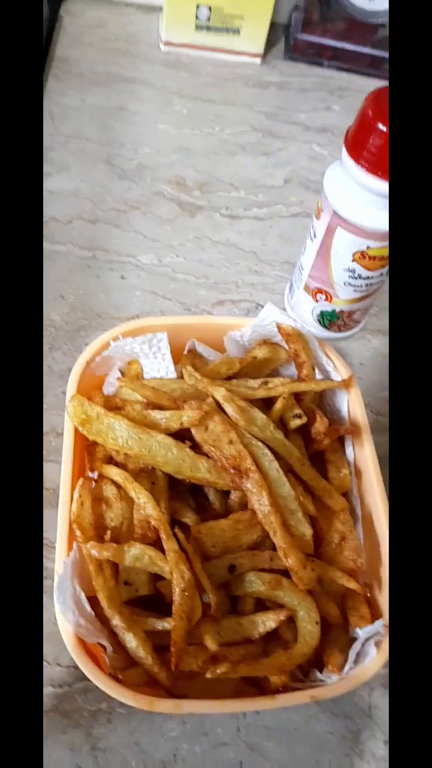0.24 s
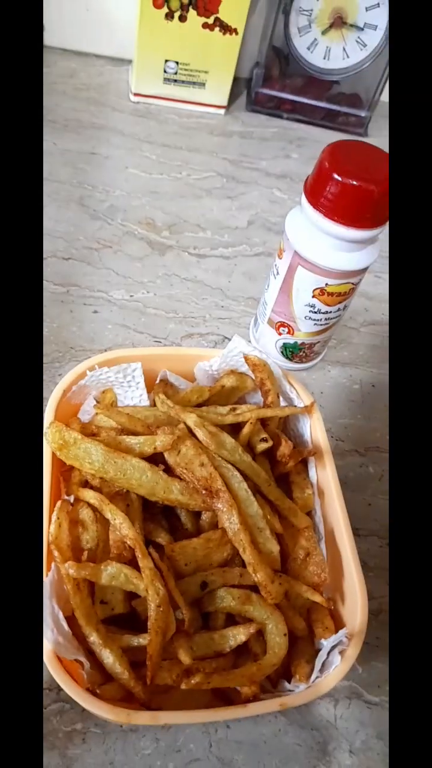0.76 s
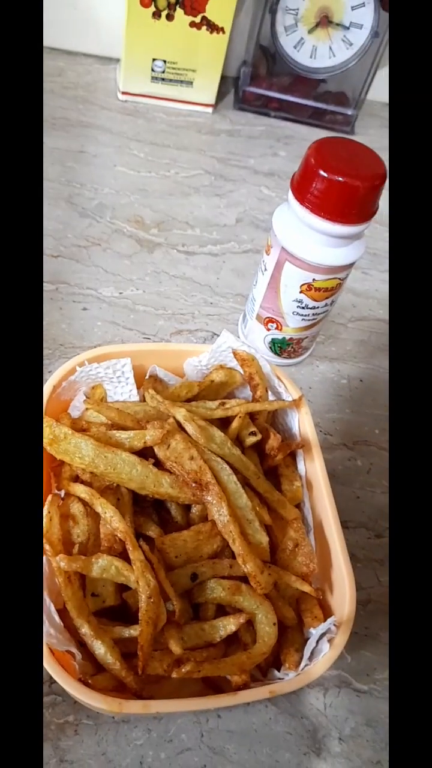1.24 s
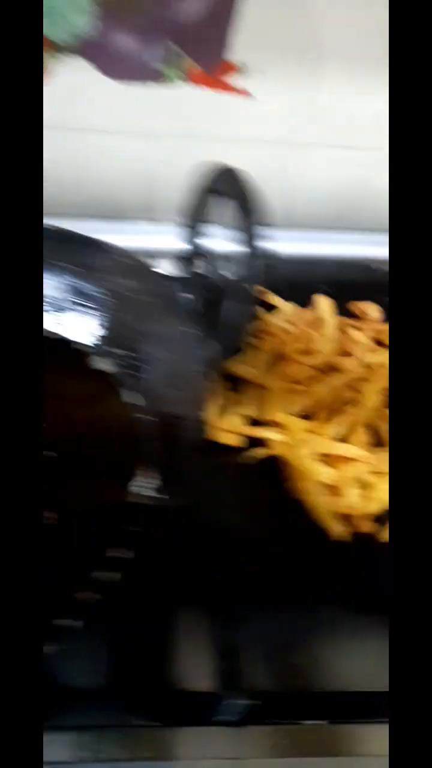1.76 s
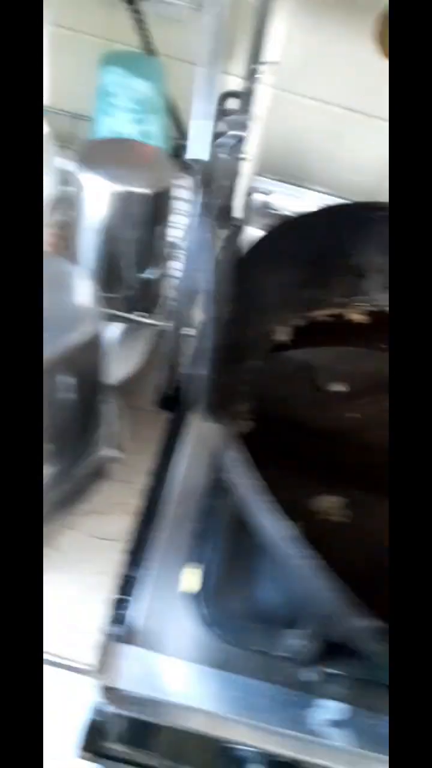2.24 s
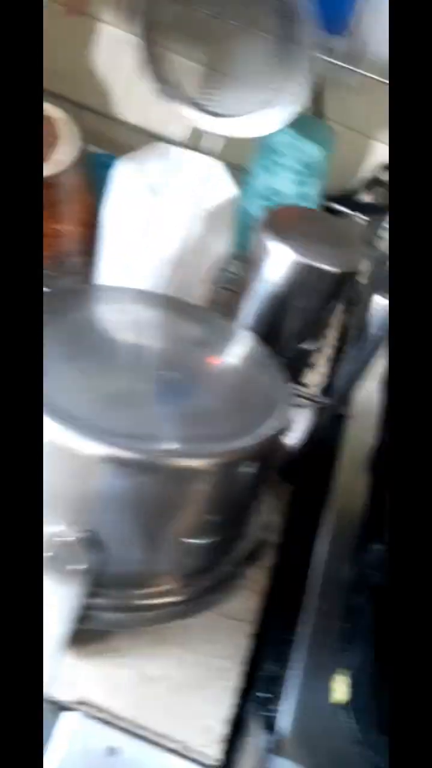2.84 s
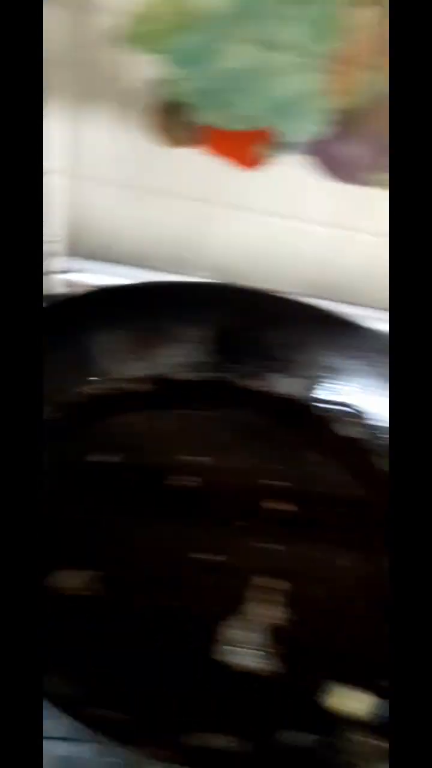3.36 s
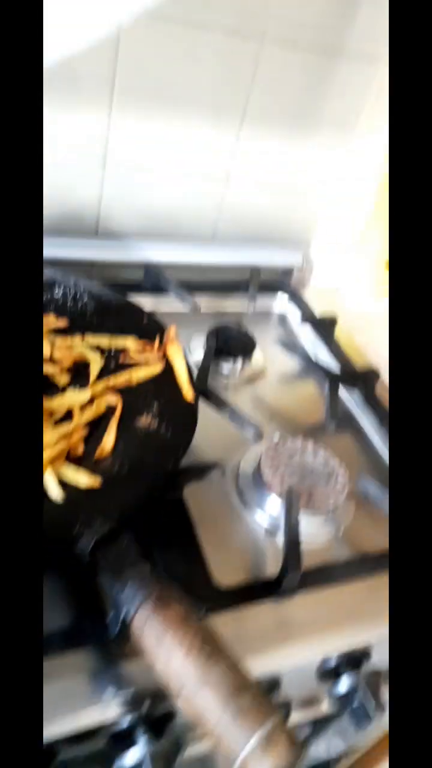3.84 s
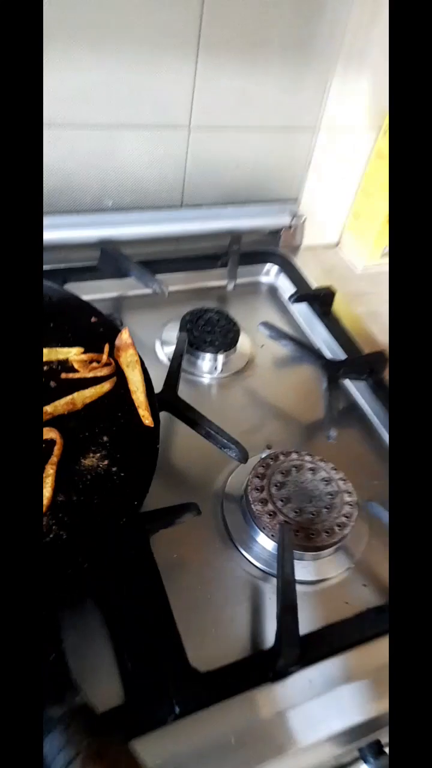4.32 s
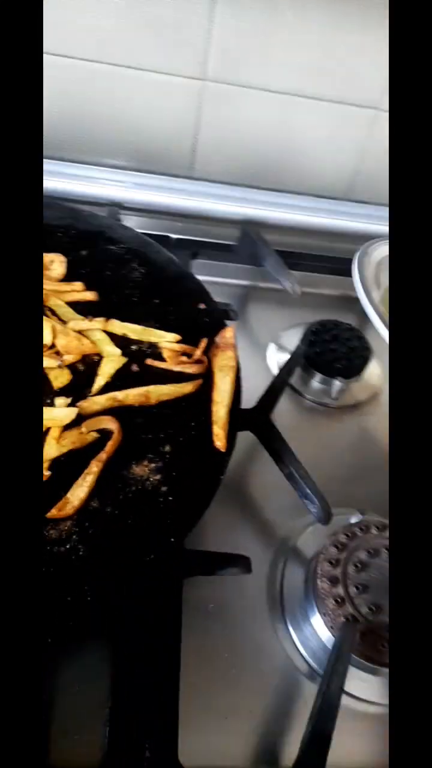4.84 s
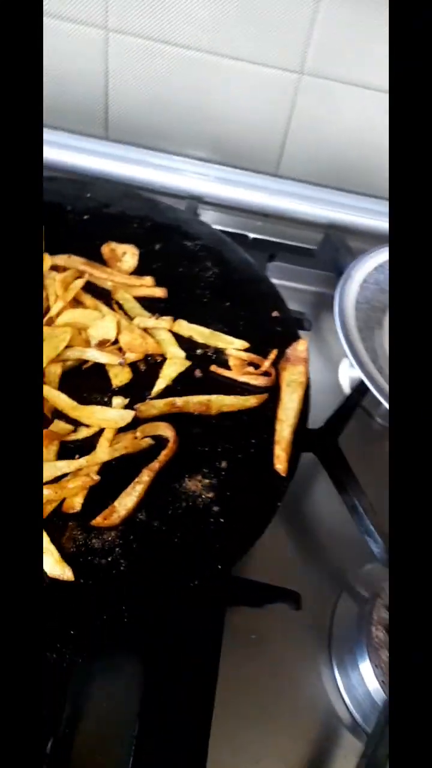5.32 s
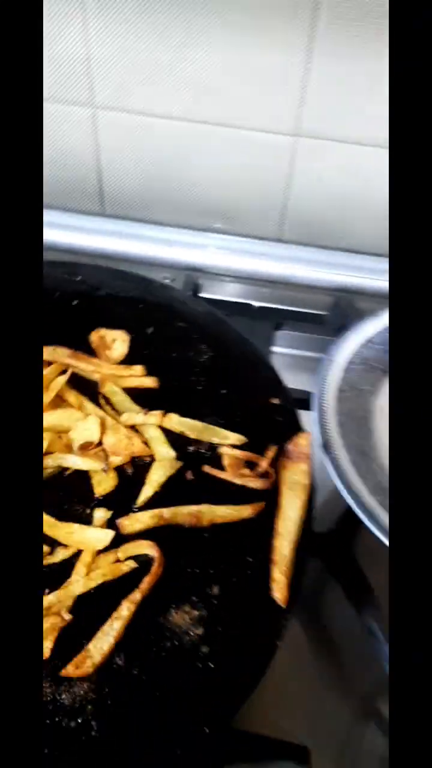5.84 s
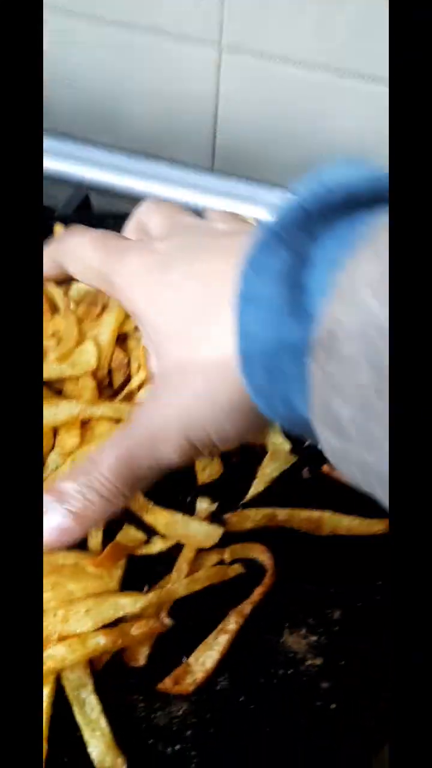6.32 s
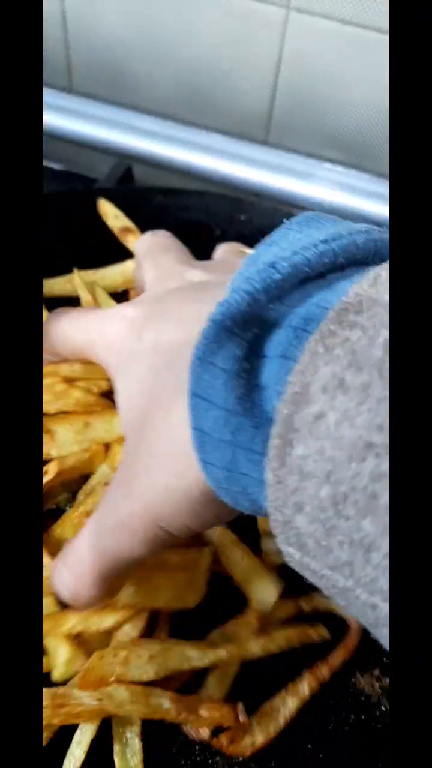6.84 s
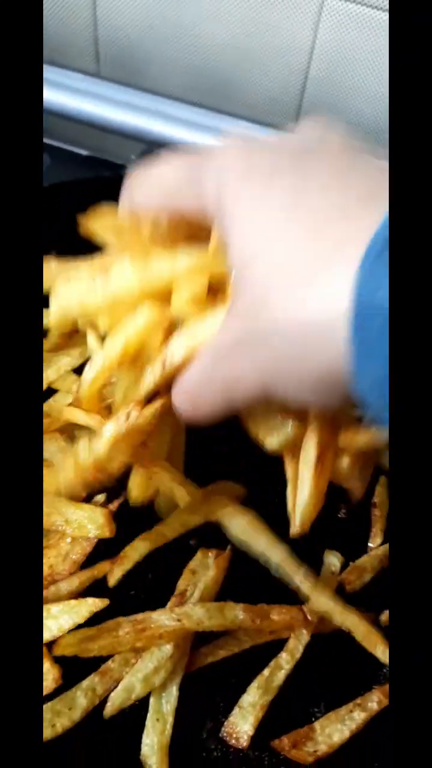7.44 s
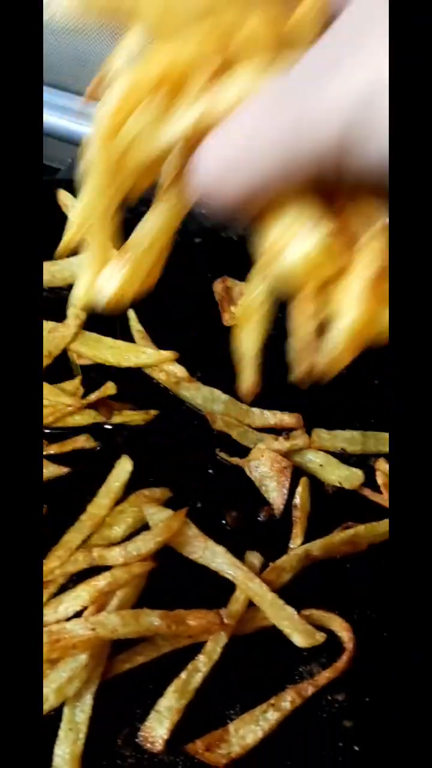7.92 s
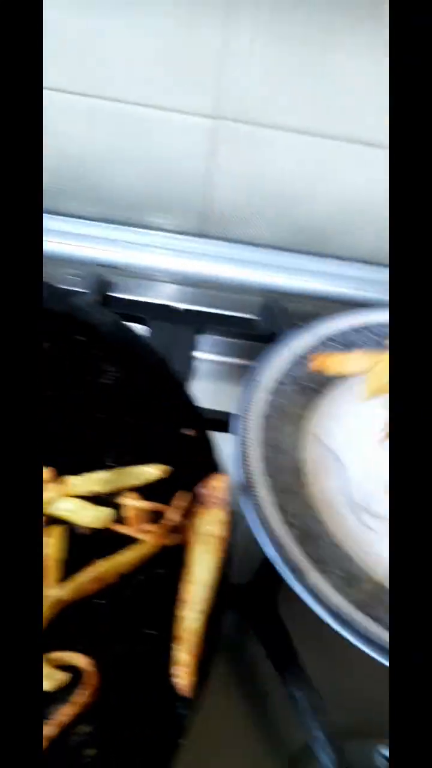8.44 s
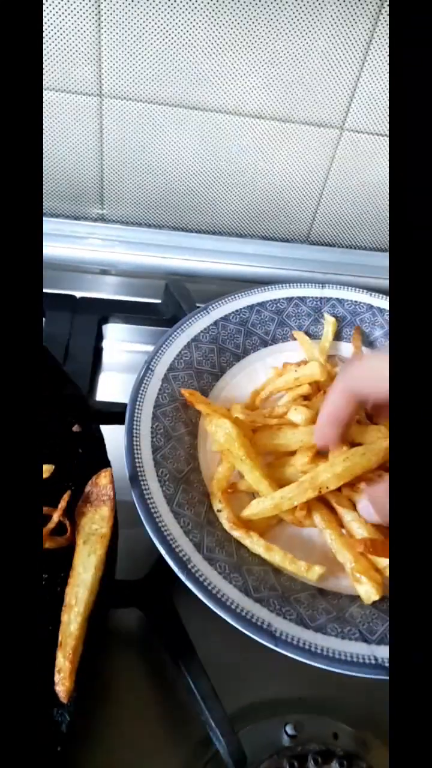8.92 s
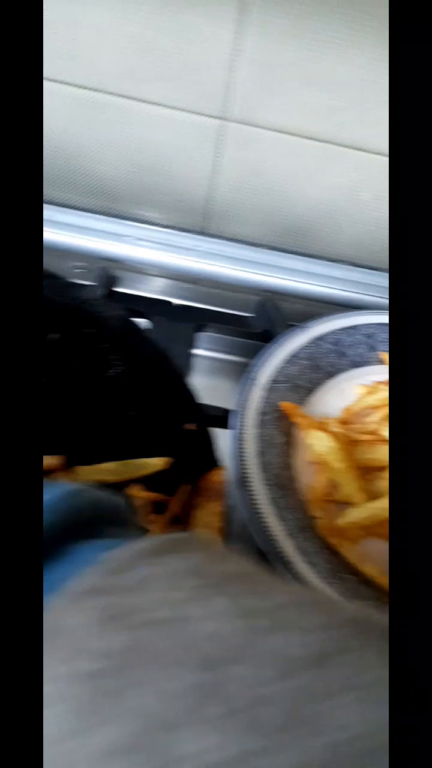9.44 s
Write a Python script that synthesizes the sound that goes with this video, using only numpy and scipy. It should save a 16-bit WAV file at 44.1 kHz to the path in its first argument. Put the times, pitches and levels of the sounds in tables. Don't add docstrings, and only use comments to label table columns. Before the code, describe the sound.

In a quiet tiled kitchen, a dish rattles off a wire rack among clanging steel pots, lands hard on an iron grate, then fries drop onto it.

```python
import sys
import numpy as np
from scipy import signal
from scipy.fft import rfft, irfft, next_fast_len
from scipy.io import wavfile

SR = 44100
rng = np.random.default_rng(int(sys.argv[2]) if len(sys.argv) > 2 else 0)


def invert_db(x):
    u = np.asarray(x, float) / 20
    return 10 ** u


def unload_wav(signal):
    wavfile.write(
        sys.argv[1],
        SR,
        np.round(np.clip(np.atleast_2d(signal).T, -1, 1) * 32767).astype(np.int16),
    )


N = 426447
STEP = 32
GAP_S = 1.376, 1.489


def rms_one(x):
    return x / np.sqrt(np.mean(x ** 2) + 1e-20)


def full(control):
    return np.repeat(control, STEP)[:N]


def in_time(rows, outside=None):
    s, *columns = np.transpose(rows)
    control_s = np.arange(0, N, STEP) / SR
    return np.array([np.interp(control_s, s, column, outside, outside) for column in columns])


def at_hz(points, hz, outside=None):
    table_hz, values = np.array(points).T
    return np.interp(np.log(hz), np.log(table_hz), values, outside, outside)


def flicker(rate, spread_db):
    knots = invert_db(spread_db * rng.standard_normal(int(N / SR * rate * 2) + 2))
    places = np.linspace(0, len(knots) - 1, -(-N // STEP))
    return np.interp(places, np.arange(len(knots)), knots)


def swells(rows):
    peak, rise, fall = np.transpose(rows)[:3, :, None]
    late = np.arange(0, N, STEP) / SR - peak
    depth_db = 20
    return invert_db(-depth_db * np.maximum(-late / np.abs(rise), late / np.abs(fall)))


# (frequency [Hz], left-right likeness [0-1])
STEREO_LIKENESS = [(60, 0.89), (180, 0.89), (340, 0.67), (520, 0.47), (1000, 0.014)]
EDGES = 22 * 2 ** np.arange(0, 9.8, .5)
BANK = [signal.butter(2, edge, "band", fs=SR, output="sos") for edge in zip(EDGES, EDGES[1:])]


def likeness(hz):
    return np.clip(at_hz(STEREO_LIKENESS, hz), 0, 1)


def bands(white, shape):
    mids = sides = 0
    for k, hz in enumerate(np.sqrt(EDGES[1:] * EDGES[:-1])):
        gain = shape(hz)
        if np.max(gain) > 1e-6:
            mid, side = signal.sosfilt(BANK[k], white[k % 2]) * gain
            alike = likeness(hz)
            mids = mids + np.sqrt(1 + alike) * mid
            sides = sides + np.sqrt(1 - alike) * side
    return np.array([mids + sides, mids - sides])


def steady(white, spectrum, patchy_db):
    def gain(hz):
        return full(invert_db(at_hz(spectrum, hz, -300)) * flicker(6, patchy_db))
    return rms_one(bands(white, gain))


def grains(per_s, size_db, count):
    shape = (2, 2, count)
    sizes = invert_db(size_db * np.minimum(rng.exponential(1, shape), 5))
    signs = np.sign(rng.random(shape) - .5)
    return rms_one(sizes * signs * (rng.random(shape) < per_s / SR))


def dying(clicks, t60, hz):
    r = invert_db(-60 / (np.clip(t60, .002, 3) * SR))
    w = 2 * np.pi * hz / SR
    return signal.lfilter([0, np.sin(w)], [1, -2 * r * np.cos(w), r * r], clicks + 1e-18)


def ringing_modes(modes, t):
    hz, _, t60 = np.transpose(modes)[:, :, None]
    apart = np.pi / 4 * (1 - likeness(hz)) * (-1) ** np.arange(len(hz))[:, None]
    rings = np.sin(2 * np.pi * hz * t + np.array([apart, -apart]))
    rings *= invert_db(-60 * t / np.clip(t60, .005, 1)) * np.cos(np.pi * t)
    wobble = rng.standard_normal((40, 80))[:len(hz)]
    rings *= [1 + np.interp(t, np.linspace(0, .5, 80), w) * np.minimum(t / .015, 1.1) for w in wobble]
    return rings


def blows(hits, modes, crack, ring_db, crack_db, crack_t60, lag_s):
    out = np.zeros((2, N + SR))
    t = np.arange(SR // 2) / SR
    short = t[:SR // 10]
    crack_top = max(at_hz(crack, hz) + 10 * np.log10(hz) for hz in EDGES)
    hz, level_db, _ = np.transpose(modes)
    rings = ringing_modes(modes, t)
    for s, db, pan, *colour in hits:
        bass, treble = colour or (-2.5, -3.5)

        def tilt(f):
            return db + np.interp(np.log(f), np.log([300, 1500, 8000]), [bass, 0, treble])

        def crack_gain(f):
            decay_db = 60 * short / crack_t60 * (f / 1000) ** 0.15
            return invert_db(at_hz(crack, f, -300) + 40.0 - crack_top + tilt(f) + crack_db - decay_db)

        chance_db, sign = rng.standard_normal((2, 40))[:, :len(hz)]
        ring = invert_db(tilt(hz) + level_db + ring_db + 2 * chance_db) * np.sign(sign) @ rings
        noise = rng.standard_normal((2, 2, len(short))) * [[1], [.9]]
        sides = invert_db([[pan / 2], [-pan / 2]])
        burst = bands(noise, crack_gain) * sides * np.cos(5 * np.pi * short)
        at = int(s * SR)
        out[:, at:at + len(t)] += ring * sides
        for side, late in enumerate((at, at + int(lag_s * SR))):
            out[side, late:late + len(short)] += burst[side]
    return out[:, :N]


# (frequency [Hz], level [dB per Hz])
RUMBLE_SPECTRUM = [(22, -45), (42, -15), (75, 0.5), (126, -1.5), (173, -19.5), (200, -22), (260, -47.5),
                   (440, -120)]
# (frequency [Hz], level [dB per Hz])
LOW_AIR_SPECTRUM = [(100, -37.5), (170, -20.5), (280, -3), (327, 1), (415, -9), (614, -16), (887, -21.5),
                    (1560, -61)]
# (time [s], rumble level [dB])
MOTION_LEVEL = [(0.0, -58.5), (0.91, -62), (1.4, -59), (1.99, -52.5), (2.56, -53), (3.2, -70), (3.5, -56.5),
                (4.07, -70), (4.58, -53), (5.2, -61.5), (5.95, -48), (6.7, -61.5), (7.19, -49.5),
                (7.92, -50), (8.29, -71), (9.2, -51.5), (9.67, -63)]
# (peak time [s], rise [s], fall [s], rumble level [dB], low air level [dB])
WORKTOP_BOOMS = [
    (2.72, 0.17, 0.72, -45.5, -58),
    (2.95, 0.46, 0.15, -49.5, -43),
    (3.424, 0.02, 0.46, -61, -76),
    (4.5, .5, 0.51, -62.5, -53.5),
    (5.38, 0.04, 0.27, -38, -50.5),
    (5.47, .1, .1, -52, -32),
    (5.625, 0.016, 0.23, -36, -34),
    (8.29, 0.21, 0.53, -56.5, -59.5),
    (8.72, 0.13, 0.16, -38, -63.5),
    (9.451, 0.29, 0.53, -75, -63),
]


def rumble_and_low_air():
    white = rng.standard_normal((2, 2, N))
    motion_db = in_time(MOTION_LEVEL)[0]
    boom, puff = invert_db(np.transpose(WORKTOP_BOOMS)[3:]) @ swells(WORKTOP_BOOMS)
    rumble = full(invert_db(motion_db) + boom) * steady(white, RUMBLE_SPECTRUM, patchy_db=5.0)
    calm_db, air_db, air_follows = -58, -70.5, 0.26
    air_level = full(invert_db(air_db + air_follows * (motion_db - calm_db)) + puff)
    cupboard = invert_db(-7) * rms_one(dying(rng.standard_normal(N), t60=0.6, hz=321.6))
    return rumble + air_level * (steady(white, LOW_AIR_SPECTRUM, patchy_db=4.0) + cupboard)


# (frequency [Hz], level [dB per Hz])
HISS_SPECTRUM = [(600, -11), (2300, -7), (3960, -17), (5180, -9.5), (7770, -20), (13700, -6.5), (15100, -5),
                 (16000, -11)]
# (frequency [Hz], ring t60 [s], level [dB], rise after the gap [dB])
HISS_HUMPS = [
    (2070, 0.012, -89, -2),
    (5200, 0.002, -85.5, 8.5),
    (6400, .002, -91, 7.5),
]


def hiss():
    after_gap = np.arange(N) / SR > GAP_S[1]
    bed = invert_db(-81) * steady(rng.standard_normal((2, 2, N)), HISS_SPECTRUM, patchy_db=2.5)
    out = bed * np.where(after_gap, invert_db(8), 1)
    white = rng.standard_normal((2, N))
    for hz, t60, db, rise_db in HISS_HUMPS:
        out = out + invert_db(db + rise_db * after_gap) * rms_one(dying(white, t60, hz))
    return out


# (time [s], level [dB])
WHINE_LEVEL = [(0, -80.5), (1.4, -80), (1.5, -82.5), (4.6, -89), (4.8, -80), (5.3, -80), (6, -92),
               (9.67, -91)]


def whine():
    level = full(invert_db(in_time(WHINE_LEVEL)[0] + 0.5) * flicker(8.9, spread_db=1))
    return level * np.sin(2 * np.pi * 1998 * np.arange(N) / SR)


# (frequency [Hz], t60 [s])
KITCHEN_DECAY = [(100, 0.94), (400, 0.55), (1500, 0.47), (5000, 0.45), (14000, 0.35)]


def kitchen(x):
    t = np.arange(SR) / SR

    def decay(hz):
        return invert_db(-60 * t / np.clip(at_hz(KITCHEN_DECAY, hz), .05, 2)) * np.minimum(t / 0.00054, 1)
    tail = bands(rng.standard_normal((2, 2, SR)), decay)
    tail = tail / np.sqrt(np.sum(tail ** 2) / 2)
    return signal.fftconvolve(x.mean(axis=0, keepdims=True), tail, axes=1)[:, :N]


# (frequency [Hz], left-right balance [dB])
PORT_LEAN = [(120, 2), (270, -3.5), (600, -1), (1400, 1.5), (3000, -1.5), (6000, -0.5), (12000, -2.5)]


def ports(x):
    size = next_fast_len(N + SR // 10, real=True)
    lean = at_hz(PORT_LEAN, np.arange(1, size // 2 + 2) * SR / size) / 2
    return irfft(rfft(x, size) * invert_db([lean, -lean]), size)[:, :N]


# (start time [s], length [s], level [dB], ring [cycles])
SLIDE_EVENTS = [(4.259, 0.1, -63.5, 40), (4.3, 0.2, -64, 53), (6.736, 0.3, -71.5, 120),
                (7.122, 0.16, -55, 35), (8.16, 0.41, -71.5, 26), (3.86, 0.22, -76, 210),
                (9.01, 0.14, -73, 47), (9.14, 0.68, -78.5, 67)]
# (frequency [Hz], ..)
SLIDE_RESONANCES = [
    (1070, 1790, 1960),
    (837, 1067, 2250, 2470, 4040),
    (1197, 1270, 1510),
    (790, 853),
    (392.6, 2430, 2400, 2870),
    (408, 409),
    (915, 1110),
    (4700, 5800, 5980, 6200),
]


def slides():
    out = np.zeros(N)
    t = np.arange(SR // 2) / SR
    for (s, length, db, cycles), resonances in zip(SLIDE_EVENTS, SLIDE_RESONANCES):
        swell = np.minimum(t / 0.011, 1) * np.clip(3 * (1 - t / length), 0, 1)
        push = rng.standard_normal(len(t)) * swell
        sound = sum(dying(push, cycles / hz, hz) for hz in resonances)
        at = int(s * SR)
        out[at:at + len(t)] += invert_db(db - 21.5) * sound
    return out


# (frequency [Hz], level [dB per Hz])
RUBBING_SPECTRUM = [(180, -19.5), (300, -8), (584, -13), (801, -9.5), (4670, -6), (6740, -9), (9470, -16.5),
                    (13500, -4.5)]
# (peak time [s], rise [s], fall [s], level [dB], treble [dB])
RUB_STROKES = [(1.629, 0.35, 3.2, -60.5, -6), (2.4, 0.49, 0.33, -51.5, -3.5), (3.349, 0.2, 1, -77.5, -7),
               (3.72, 0.099, 0.26, -62.5, -10), (4.033, 0.0044, 0.22, -61.5, -1),
               (4.07, 0.025, 0.11, -55.5, -12), (4.309, 0.041, 0.39, -59, -6), (4.534, 0.031, 0.2, -53, -3),
               (5.52, 0.13, 0.33, -60.5, -3.5), (6.566, 0.026, 1.1, -65, -3.5), (6.77, 0.048, 0.24, -57, 1),
               (6.885, 0.092, 0.088, -47.5, 0.5), (6.974, 0.099, 0.056, -50, -4),
               (7.157, 0.19, 0.55, -41.5, -2), (7.4, 0.48, 0.35, -55.5, -5.5),
               (7.63, 0.1, 0.074, -61.5, -4), (7.81, 0.13, 0.015, -58.5, -9),
               (8.217, 0.039, 0.63, -63, -7.5), (9.039, 0.098, 0.11, -60, 0.5), (9.5, 0.5, 0.86, -92, -5),
               (9.67, 0.03, 0.082, -61, 7)]


def rubbing():
    db, treble_db = np.transpose(RUB_STROKES)[3:]
    push = invert_db(db)[:, None] * swells(RUB_STROKES)
    total = push.sum(axis=0)
    level = total * flicker(25, spread_db=2.0)
    treble = treble_db @ push / (total + 1e-30)

    def gain(hz):
        return full(level * invert_db(9.5 + at_hz(RUBBING_SPECTRUM, hz, -300) + treble * np.log2(hz / 2000) / 2))
    rub = bands(grains(per_s=4000, size_db=2.5, count=N), gain)
    return rub * invert_db([[-1.2], [1.2]]) * (np.arange(N) / SR > GAP_S[1])


# (time [s], peak level [dB], left-right [dB])
THUD_HITS = [
    (1.768, -38, -8),
    (5.3, -49.5, 0.5),
    (6.131, -41.5, -8),
    (6.231, -33.5, -4.5),
    (7.03, -33, 1),
]
# (frequency [Hz], level [dB], t60 [s])
HOB_MODES = [(81, -16.5, 0.11), (126, -17.5, 0.074), (192.2, -4.5, 0.2), (215, -18, 0.072),
             (261, -15.5, 0.016), (332, -9.5, 0.12), (322, -0.5, 0.13), (348, -18.5, 0.083),
             (437, -10, 0.02)]
# (frequency [Hz], level [dB per Hz])
THUD_NOISE = [(80, -0.5), (300, -4.5), (900, -6.5), (1800, -26.5), (3000, -26), (6000, -49)]
# (time [s], peak level [dB], left-right [dB])
DOOR_KNOCKS = [
    (3.416, -43, -10),
    (6.934, -37.5, 0.5),
    (7.028, -44, -6),
]
# (frequency [Hz], level [dB], t60 [s])
DOOR_MODES = [(312.2, -1, 0.075), (340, -1, 0.028), (239.4, -16, 0.035), (410, -8, 0.039)]


def thuds():
    hob = blows(THUD_HITS, HOB_MODES, THUD_NOISE, ring_db=-22.0, crack_db=-11.5, crack_t60=0.07, lag_s=.0001)
    door = blows(DOOR_KNOCKS, DOOR_MODES, THUD_NOISE, ring_db=-5.5, crack_db=-18, crack_t60=0.047, lag_s=0)
    return hob + door


# (time [s], peak level [dB], left-right [dB])
TICK_HITS = [(0.219, -44.5, -15), (1.598, -42, -12), (1.849, -39, -5), (3.679, -51, -4),
             (4.031, -47, -22.5), (4.137, -50, -6), (4.267, -52, -2), (4.303, -34.5, 8), (6.558, -53, -14),
             (6.714, -48.5, -15)]
# (frequency [Hz], level [dB], t60 [s])
PAN_MODES = [(1116, -12, 0.11), (1210, -12.5, 0.072), (1250, -3.5, 0.042), (1520, -9, 0.17),
             (1910, -13.5, 0.14), (2580, -14, 0.095), (3138, -8, 0.091), (4500, -7, .02), (4990, -5, 0.035),
             (6300, -2, 0.022)]
# (frequency [Hz], level [dB per Hz])
TICK_NOISE = [(400, -23), (1000, 4), (4000, -2), (9000, -6.5), (16000, -2)]


def ticks():
    return blows(TICK_HITS, PAN_MODES, TICK_NOISE, ring_db=-36, crack_db=2.5, crack_t60=0.0049, lag_s=.0001)


# (time [s], peak level [dB], left-right [dB], bass [dB], treble [dB])
FRY_HITS = [(7.574, -52, -5, -9, 16), (7.592, -32.5, -12, -8, -5.5), (7.598, -33.5, -6, -14, -6),
            (7.644, -42.5, -7, -8, 3), (7.656, -44.5, -6, -2.3, 6), (7.684, -52, -13, 0, 0),
            (7.732, -40, -13, -2, -6), (7.751, -26, -8, 19, -10), (7.757, -33.5, -10, -5, 1),
            (7.767, -33.5, -3, -1, 3.5), (7.929, -36, -6.5, -7, 6.5)]
# (frequency [Hz], level [dB], t60 [s])
RIM_MODES = [(1111, 0, 0.15), (1420, -12, .12), (1510, -7, 0.12), (1760, -11, .08), (2550, -8, .1),
             (3105, -9, 0.07), (4250, -11, 0.12), (4560, 0, 0.03), (6541, -5, 0.07), (6708, -5, 0.04),
             (6955, -4, 0.07), (9400, -6, 0.06), (11000, -9, 0.05), (12640, -6, 0.06)]
# (frequency [Hz], level [dB per Hz])
PAN_NOISE = [(600, -35), (1100, -25), (1500, -4.5), (2500, -3), (4700, 2), (8000, -7.5), (16000, 1)]


def pan_and_rim():
    pan = blows(FRY_HITS[:-1], PAN_MODES, PAN_NOISE, ring_db=-8.0, crack_db=-2.5, crack_t60=0.052, lag_s=.0001)
    rim = blows(FRY_HITS[-1:], RIM_MODES, PAN_NOISE, ring_db=-5.0, crack_db=0.46, crack_t60=0.0807, lag_s=.0001)
    return signal.sosfilt(signal.butter(4, 1150, "high", fs=SR, output="sos"), pan + rim)


# (frequency [Hz], level [dB per Hz])
STEEL_NOISE = [(35, -44.5), (60, -4.5), (212, -19), (553, -3.5), (1510, -2), (3500, -5), (9130, -12.5),
               (16000, -9.5)]
# (time [s], peak level [dB], left-right [dB])
WIRE_PLUCKS = [
    (2.624, -46, 0),
    (2.641, -37, 0),
    (2.657, -21.5, 2),
    (2.67, -20, 2),
    (2.691, -19, 2),
    (2.708, -21, 2),
    (2.757, -19, 2),
    (2.772, -19.5, 2),
    (2.878, -22, 2),
]
# (frequency [Hz], level [dB], t60 [s])
WIRE_MODES = [(1450, -6, .035), (2150, 0, .045), (2270, -1, .045), (2480, -5, .035), (2950, -9, .03)]


def wires():
    return blows(WIRE_PLUCKS, WIRE_MODES, STEEL_NOISE, ring_db=-3, crack_db=-25, crack_t60=.04, lag_s=0)


# (time [s], level [dB])
DRAG_LEVEL = [(2.615, -62), (2.65, -46.5), (2.665, -26), (2.72, -24.5), (2.78, -28), (2.83, -35.5),
              (2.9, -33.5), (2.96, -32), (3.0, -36.5)]
# (frequency [Hz], level [dB], t60 [s])
RACK_MODES = [(311.3, -16, 0.2), (703, -12.5, 0.051), (1340, -7, 0.06), (1600, -7.5, 0.032),
              (2210, -4, 0.07), (2096, -8, 0.08), (3087, -10, 0.11), (4540, -14.5, 0.06),
              (5400, -12.5, 0.037)]


def drag():
    out = np.zeros((2, N))
    start, count = int(DRAG_LEVEL[0][0] * SR), SR // 2
    push = full(invert_db(in_time(DRAG_LEVEL, -200)[0]) * flicker(40, spread_db=4))
    slips = grains(per_s=3000, size_db=4.0, count=count) * push[start:start + count]
    rattle = sum(invert_db(db - 32.5) * dying(slips[0], 1.1 * t60, hz) for hz, db, t60 in RACK_MODES)
    scrape = bands(slips, lambda hz: invert_db(at_hz(STEEL_NOISE, hz, -200) + 5.5))
    out[:, start:start + count] = rattle + scrape
    return out


# (time [s], peak level [dB], left-right [dB], bass [dB], treble [dB])
RACK_BLOWS = [(2.644, -36.5, -1.5, 0, -19), (2.657, -24.5, 3.5, -5, -11), (2.664, -15, 6.5, -2, -9),
              (2.677, -15.5, 5, -0.5, -13.5), (2.690, -17, 6, 4, -4), (2.727, -19, 4.5, 5.5, -1.5),
              (2.745, -16.5, 2.5, -7.5, -11), (2.762, -17.5, 4, -7, -12), (2.799, -23, 2, -3, 3.5),
              (2.834, -23, 3.5, -1, 8), (2.877, -14.5, 1.5, -3, 5), (2.886, -23, 3.5, -4.5, -3)]


def rack():
    return blows(RACK_BLOWS, RACK_MODES, STEEL_NOISE, ring_db=-6.0, crack_db=-4.1, crack_t60=0.079, lag_s=.0004)


# (time [s], peak level [dB], left-right [dB], bass [dB], treble [dB])
LID_BLOWS = [
    (2.916, -15, 9.7, -2, 1),
    (2.927, -20, 6.4, -3, -0.5),
    (2.936, -17, 3.8, -3, -4),
]
# (frequency [Hz], level [dB], t60 [s])
LID_MODES = [(1120, -9, .05), (312, -15, .15), (1330, 0.5, 0.04), (1510, 2.5, 0.049), (1625, 0, 0.032),
             (1860, -14, 0.1), (2530, -11, 0.07), (2750, -10.5, .07), (4180, -14, .04), (5170, -13.5, .05)]


def lid():
    return blows(LID_BLOWS, LID_MODES, STEEL_NOISE, ring_db=-1.3, crack_db=-2.5, crack_t60=0.051, lag_s=.0004)


# (time [s], peak level [dB], left-right [dB], bass [dB], treble [dB])
POT_BLOWS = [
    (2.984, -17.5, 7.4, -7.5, 4),
    (2.989, -5.5, 3.5, -2.5, 1.5),
    (2.995, -16, 3.5, 1, -1.5),
    (3.024, -18, 5, -9, 3.5),
    (3.088, -26, 3.2, -7.5, 0),
]
# (frequency [Hz], level [dB], t60 [s])
POT_MODES = [(311, -13, .3), (544, -14, 0.3), (627, -8, 0.22), (645, -11, .15), (775, -15, .22),
             (1325, -14, 0.12), (1535, -6, 0.08), (2490, -8, .05), (3270, -3, 0.035), (3397, -3, 0.04),
             (3545, -3, 0.05), (3570, -6, .08), (3572, -15, 0.42), (4156, -17, 0.08)]


def pots():
    return blows(POT_BLOWS, POT_MODES, STEEL_NOISE, ring_db=-10.0, crack_db=-3.5, crack_t60=0.054, lag_s=0.00017)


# (time [s], peak level [dB], left-right [dB], bass [dB], treble [dB])
DISH_BLOWS = [(8.483, -40, -4, 0, -1.5), (8.505, -42.5, -10, -5.5, -1), (8.524, -27.5, -1.5, -4, 0),
              (8.566, -26.5, 0, -10, -7), (8.608, -31, 4, 10.5, -6), (8.62, -17.5, -3.5, -4.5, -8),
              (8.641, -24, 3, -6, 3), (8.644, -14, -9, -6, 3), (8.651, -20, 7, 0, -3.5),
              (8.662, -24, -7, 3, 6), (8.68, -16, 5, -14, -16), (8.692, -29.5, -7, 0, -15.5),
              (8.742, -21, -8.5, -32, -1.5), (8.749, -27, 2, -1, 2), (8.77, -31, -12, -16, -2),
              (8.791, -22, -5, -2.5, -7), (8.797, -42, 3, -28, -8), (8.886, -34, -4, -41, -6.5),
              (8.91, -50.5, -8, -19, 4), (9.04, -44.5, -1, 2, -1)]
# (frequency [Hz], level [dB], t60 [s])
DISH_MODES = [(905, -12.5, 0.11), (1155, 0.5, 0.046), (1950, -1, 0.072), (2070, -9.5, 0.23),
              (3055, 4, 0.035), (3000, -24, 0.071), (3580, -8.5, 0.1), (3930, -3, 0.026), (4840, 6, 0.032),
              (4900, -24, .07), (6790, 1, 0.035), (7340, -4.5, 0.025)]
# (frequency [Hz], level [dB per Hz])
DISH_NOISE = [(59, -42), (100, 3), (350, 2.5), (1300, -7), (1910, -1), (6290, 1), (7610, -15.5), (16000, 5)]
# (time [s], peak level [dB], left-right [dB], bass [dB], treble [dB])
RIM_STRIKES = [
    (8.644, -9, -5.5, 0, 2),
    (8.662, -24, -8, 0, -5),
    (8.742, -27, -6, 0, -5),
    (8.791, -21, -6, 0, -8),
]
# (frequency [Hz], level [dB], t60 [s])
DISH_RIM_MODES = [(3750, -2, .03), (4960, 0, .025), (7450, -1, .022)]


def dish():
    body = blows(DISH_BLOWS, DISH_MODES + HOB_MODES, DISH_NOISE,
                 ring_db=-15.0, crack_db=-4.0, crack_t60=0.098, lag_s=.00005)
    edge = blows(RIM_STRIKES, DISH_RIM_MODES, DISH_NOISE, ring_db=-13.5, crack_db=-19, crack_t60=0.055, lag_s=0)
    return body + edge


# (time [s], peak level [dB], left-right [dB], bass [dB], treble [dB])
GRATE_BLOWS = [(5.322, -17.5, 1.5, -3.5, -4), (5.325, -1.5, -2, 9.5, -12.5),
               (5.334, -7.5, -1.5, 12.5, -16.5), (5.362, -17.5, 5.5, 13, -16.5),
               (5.396, -20, -2.5, 17.5, -23.5), (5.459, -15.5, 0.5, 6.5, -26), (5.603, 2.5, -5, 1, -9),
               (5.612, -4.5, -3, 9, -14.5), (5.624, -3, -2, 9, -14.5), (5.68, -22.5, 6, 10.5, -27),
               (5.73, -18, -2, 10.5, -36), (5.853, -46.5, -2, -13, 5)]
# (frequency [Hz], level [dB], t60 [s])
GRATE_MODES = [(587, -6, 0.12), (843, -4, 0.2), (1030, -10.5, 0.083), (1300, -13.5, 0.067),
               (1155, -14, 0.075), (1230, -18.5, 0.13), (1473, -9, 0.084), (1722, -3, .1),
               (1904, -1.5, 0.21), (2006, -8.5, 0.26), (2240, -17.5, .08)]
# (frequency [Hz], level [dB], t60 [s])
FOOT_MODES = [(2400, -9, .05), (2930, 2, .07), (3020, 13, .04), (2977, -11, .3), (3035, -13, .25),
              (3811, -10, .05), (4900, 10, .03), (4860, -15, .2), (4960, -14, .22), (6730, 3, 0.03),
              (6640, -19, .15)]
# (frequency [Hz], level [dB per Hz])
GRATE_NOISE = [(60, -30.5), (398, -8), (1220, -5), (1400, -22.5), (2970, 0), (3500, -17), (4860, -10.5),
               (16000, -29.5)]


def grate():
    return blows(GRATE_BLOWS, GRATE_MODES + FOOT_MODES + HOB_MODES, GRATE_NOISE,
                 ring_db=-21.0, crack_db=-2.0, crack_t60=0.057, lag_s=.0001)


def scene():
    steel = rack() + drag() + lid() + pots()
    landing, contacts = grate(), thuds()
    fries, rocking = pan_and_rim() + ticks(), dish()
    send = invert_db(-1.5) * steel + invert_db(-7.0) * landing + contacts + invert_db(-13.5) * (fries + 1.8 * rocking)
    close = ports(steel + landing + contacts + fries + rocking + kitchen(send))
    background = rumble_and_low_air() + hiss() + whine()
    return close + rubbing() + slides() + background + wires()


def top_cut(x):
    return signal.sosfilt(signal.butter(12, 16970, fs=SR, output="sos"), x)


def record(dry):
    t = np.arange(N) / SR
    wet = signal.sosfilt(signal.butter(4, 50, "high", fs=SR, output="sos"), dry)
    wet = np.tanh(wet) * ((t < GAP_S[0]) | (t > GAP_S[1]))
    wet = signal.sosfilt(signal.cheby2(12, 30, 16150, fs=SR, output="sos"), wet)
    return top_cut(wet)


dry = scene()
out = record(dry)
unload_wav(out)
```